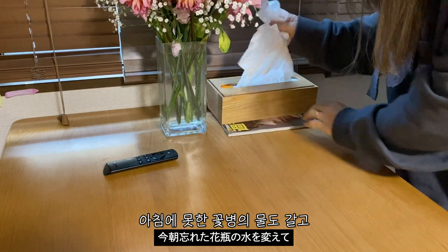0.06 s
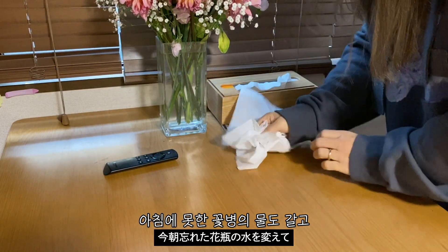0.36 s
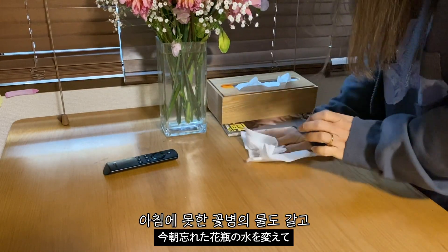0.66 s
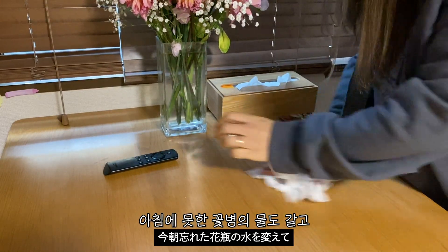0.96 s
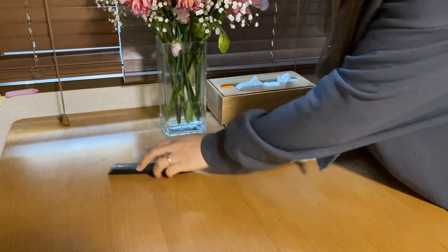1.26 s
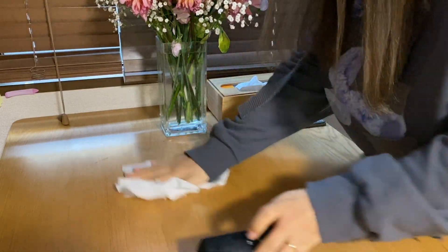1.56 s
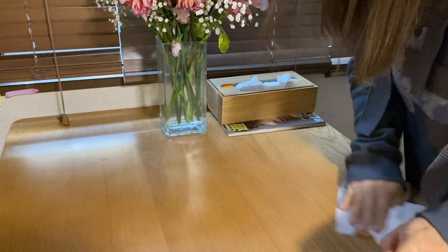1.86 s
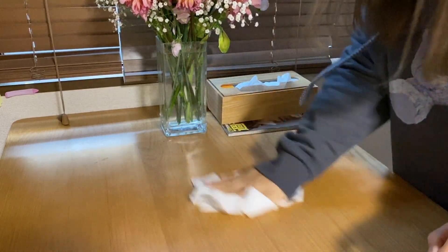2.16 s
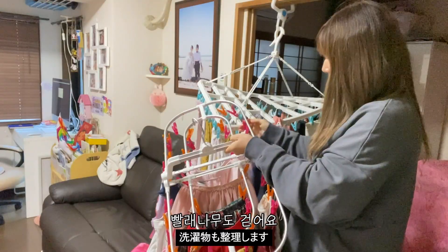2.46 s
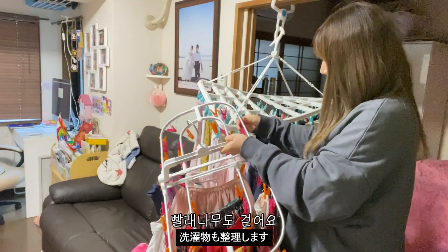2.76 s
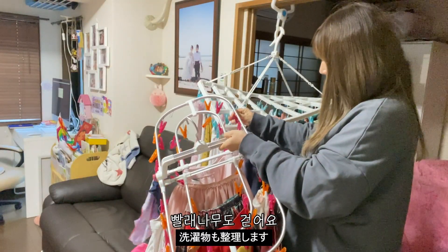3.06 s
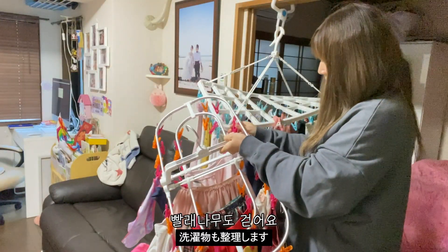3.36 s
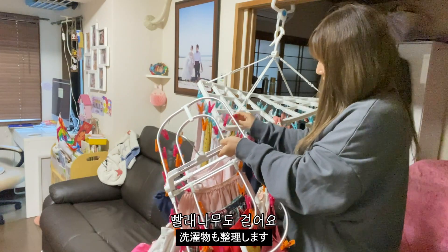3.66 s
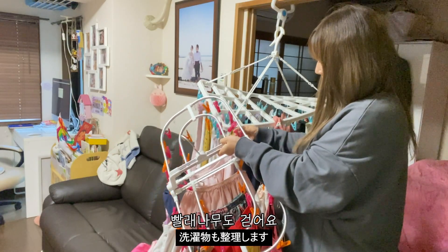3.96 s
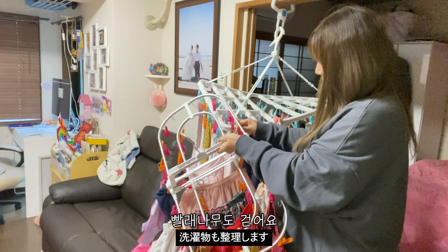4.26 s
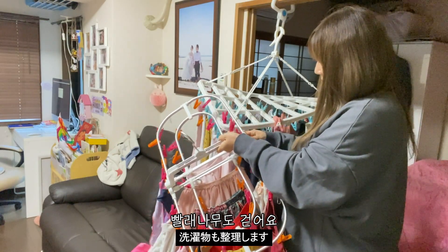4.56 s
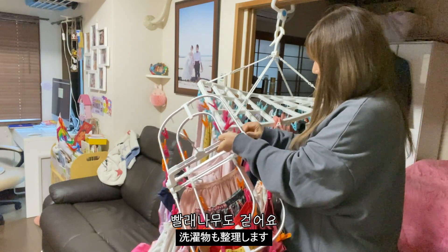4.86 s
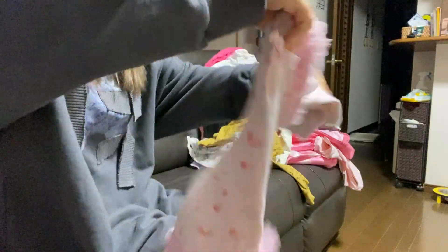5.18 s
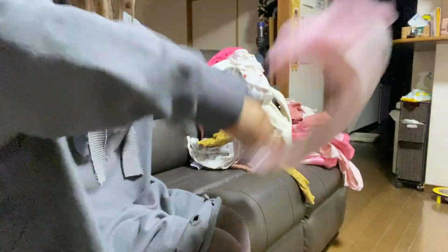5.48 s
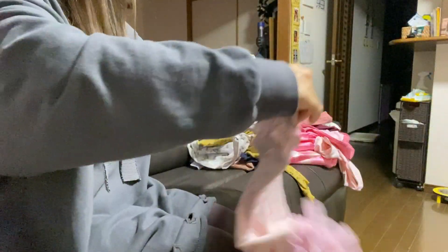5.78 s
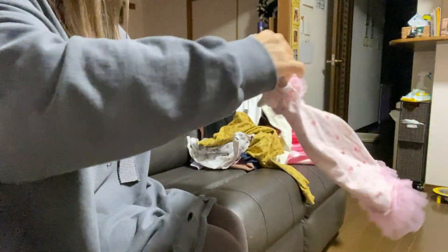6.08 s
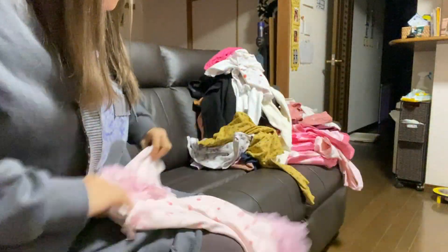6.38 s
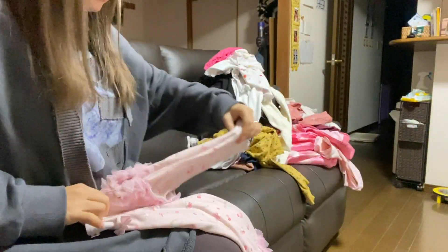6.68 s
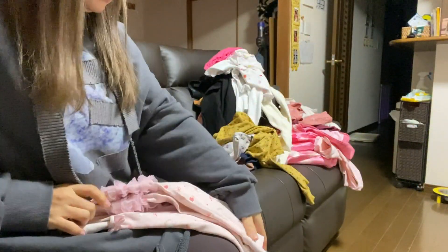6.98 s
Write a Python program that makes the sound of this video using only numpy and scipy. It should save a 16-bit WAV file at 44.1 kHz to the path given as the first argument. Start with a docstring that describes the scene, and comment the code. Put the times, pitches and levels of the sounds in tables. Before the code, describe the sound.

A tissue wipes a wooden table with knocks and scrapes, plastic laundry pegs click, then a small garment is shaken with one sharp flap.

```python
"""A tissue is tugged from its hollow box, then hisses over a wooden table in a small living room;
hands knock and judder on the wood, and a remote control thuds, scrapes and taps as it is lifted.
Next, laundry is unclipped from a plastic peg hanger: pegs snap, chatter and knock on the frame.
Last and loudest, a small garment whips taut in one sharp flap, then is laid on a lap and smoothed.
The room hums quietly throughout."""
import sys
import numpy as np
from scipy import signal
from scipy.fft import rfft, irfft, next_fast_len
from scipy.io import wavfile

SR = 44100
rng = np.random.default_rng(int(sys.argv[2]) if len(sys.argv) > 2 else 0)


def waveform_to_disk(signal):
    """Save audio, clipped to [-1, 1], as 16-bit WAV at the path in sys.argv[1]."""
    frames = np.transpose(np.atleast_2d(signal))
    scaled = np.clip(frames, -1, 1) * 32767
    samples = np.round(scaled).astype(np.int16)
    wavfile.write(sys.argv[1], SR, samples)


N = 318843
TIME = np.arange(N) / SR
SLOW = TIME[::40]   # coarse time axis for hand movements
HANGER_START_S, HANGER_END_S = 2.4, 4.999


def amp(db):
    """Decibels to gain."""
    return 10 ** (np.asarray(db) / 20)


def rms_one(x):
    """Scale to rms 1."""
    return x / np.sqrt(np.mean(x ** 2) + 1e-20)


def fader(rows):
    """Gain over time from (s, dB) rows; silent outside them."""
    s, db = np.transpose(rows)
    return amp(np.interp(TIME, s, db, left=-200, right=-200))


def at_hz(points, hz):
    """Read a curve on a log-frequency axis."""
    points = np.array(points)
    return np.interp(np.log(hz + 1e-9), np.log(points[:, 0]), points[:, 1])


def colour(x, curve):
    """Apply an EQ curve that falls off steeply below its first point; rms 1."""
    size = next_fast_len(N)
    hz = np.arange(size // 2 + 1) * SR / size
    gain = amp(at_hz(curve, hz)) * np.minimum(hz / curve[0][0], 1) ** 2
    return rms_one(irfft(rfft(x, size) * gain, size)[..., :N])


def drift(per_s):
    """Random wander, gliding to a new value per_s times a second."""
    knots = rng.standard_normal(4000)
    return np.interp(TIME * per_s, np.arange(len(knots)), knots)


def grains(per_s, spread_db, clump_db):
    """Tiny stick-slip releases of uneven size that come in clumps; rms 1."""
    sizes = amp(spread_db * np.minimum(rng.exponential(1, N), 4)) * rng.choice([-1, 1], N)
    released = rng.random(N) < per_s / SR
    return rms_one(sizes * released * amp(clump_db * drift(70)))


def resonate(x, modes, detune=1):
    """Parallel resonances (Hz, width in Hz, dB) with alternating signs."""
    out = 0
    for k, (hz, width, db) in enumerate(modes):
        radius, angle = np.exp(-np.pi * width / SR), 2 * np.pi * hz * detune / SR
        ring = signal.lfilter([1, 0, -1], [1, -2 * radius * np.cos(angle), radius ** 2], x + 1e-18)
        out = out + (-1) ** k * amp(db) * (1 - radius ** 2) / 2 * ring
    return out


def add(track, s, sound):
    """Mix a short sound into a track at s seconds."""
    start = max(round(s * SR), 0)
    track[start:start + len(sound)] += sound[:N - start]


def stroke(s, length, rise=0.48, shape=2):
    """Coarse gain of a hand movement that peaks at s; shape 1 is pointed, 2 is rounded."""
    away = np.maximum((s - SLOW) / rise, (SLOW - s) / (1 - rise)) / length
    return np.exp(-np.minimum(away ** shape, 20))


def together(gains):
    """Gain per sample of unrelated movements heard at once: their powers add."""
    return np.interp(TIME, SLOW, np.sqrt(sum(gain ** 2 for gain in gains)))


def pulses(rows):
    """Short pushes of air: pressure wavelets from (s, peak dB, Hz, cycles) rows."""
    out = np.zeros(N)
    for s, db, hz, cycles in rows:
        half = round(2 * cycles / hz * SR) + 1
        phase = np.arange(-half, half + 1) * hz / SR
        wave = np.exp(-(2 * phase / cycles) ** 2) * np.sin(2 * np.pi * phase)
        add(out, s - half / SR, amp(db) * wave / np.abs(wave).max())
    return out


# The room's stereo width. Each row: frequency in Hz, left-right correlation.
STEREO_LIKENESS = [(60, 0.95), (250, 0.63), (500, 0.41), (900, -0.26), (2000, 0.1), (6000, 0.11)]
def stereo_noise(size):
    """White noise, alike on both sides in the bass and nearly unrelated higher up."""
    mid, side = rfft(rng.standard_normal((2, next_fast_len(size, True))))
    alike = at_hz(STEREO_LIKENESS, np.linspace(0, SR / 2, len(mid)))
    return irfft(np.sqrt(1 + alike) * mid + np.sqrt(1 - alike) * side * [[1], [-1]])[:, :size]


def reverb_tail(x, t60):
    """Diffuse tail of a moving source: each short stretch of sound meets other reflections."""
    hop, size = SR // 25, SR // 3
    t, window = TIME[:size], np.sin(np.linspace(0, np.pi, 2 * hop))
    decay = rms_one(amp(-60 * t / t60) * (1 - np.exp(-t / 0.00006))) / np.sqrt(size)
    noise = rms_one(stereo_noise(N + size))
    padded, out = np.pad(x, (hop, 2 * hop)), np.zeros((2, N + 2 * size))
    for i, place in zip(range(0, N, hop), rng.integers(0, N, N // hop + 1)):
        piece = padded[i:i + 2 * hop] * window
        if np.abs(piece).max() > 1e-6:
            tail = signal.fftconvolve(piece[None], noise[:, place:place + size] * decay, axes=1)
            out[:, i:i + tail.shape[1]] += tail
    return out[:, hop:hop + N]


# Early reflections off nearby surfaces. Each row: delay in seconds, level in dB.
REFLECTIONS = [(.0033, -20.5), (0.0106, -15)]
def room(x, wet_db, t60, lag_s=0, echo_db=0):
    """Direct sound (reaching the right side lag_s later), two near reflections and the diffuse tail."""
    early = x + sum(amp(db + echo_db) * np.interp(TIME - delay, TIME, x, left=0)
                    for delay, db in REFLECTIONS)
    direct = np.array([early, np.roll(early, round(lag_s * SR))])
    return (direct + amp(wet_db) * reverb_tail(x, t60)) / np.sqrt(1 + amp(2 * wet_db))


# The dark bed of room tone. Each row: frequency in Hz, EQ gain in dB.
ROOM_TONE_EQ = [(30, -8), (48, -3.5), (68, 4), (120, -4.5), (210, -12.5), (450, -16), (800, -18.5),
                (1150, -17.5), (1500, -22.5), (2200, -28), (4000, -44), (9000, -47.5), (15000, -60)]
# The hum's bands. Each row: centre in Hz, width in Hz, gain in dB.
HUM_BANDS = [(205, 30, 2), (381.5, 19, -3.5), (597, 11.8, 1), (718.5, 11.7, -1.5), (878, 25, 0),
             (1143, 76, -14)]
# Fader moves for the bed and for the hum. Each row: time in seconds, level in dB.
ROOM_TONE_FADER = [(0, -54.5), (2.38, -59), (2.42, -59.5), (4.98, -60), (5.02, -55.5), (7.23, -57.5)]
HUM_FADER = [(0, -70), (2.4, -66), (4.98, -69.5), (5.02, -68), (7.23, -62)]
def room_hum():
    """A soft, low wash of noise with narrow, wavering bands humming in it."""
    bed = fader(ROOM_TONE_FADER) * colour(stereo_noise(N), ROOM_TONE_EQ)
    hum = fader(HUM_FADER) * rms_one(resonate(stereo_noise(N), HUM_BANDS))
    return bed + hum


# The box's hollow voice. Each row: centre in Hz, width in Hz, gain in dB.
BOX_MODES = [(245, 110, 0), (520, 130, 2), (760, 160, -4), (1550, 300, -14)]
def tissue_pull(drag):
    """The tissue is tugged free, then drags through the slot; its friction sounds the box."""
    tug = amp(-42 - 300 * np.minimum(SLOW, 1))   # falls 300 dB a second
    friction = grains(per_s=2500, spread_db=0.78, clump_db=1.2)
    return together([tug, amp(-53.5) * drag]) * rms_one(resonate(friction, BOX_MODES))


# The box's pop. Each row: pitch in Hz, level in dB, seconds to fade by 60 dB.
BOX_POP_TONES = [(228, -40, .15), (468, -36.5, .1)]
def box_pop():
    """The lifted box drops back on the table and its hollow body rings briefly."""
    out, t = np.zeros(N), TIME[:SR // 2]
    for hz, db, t60 in BOX_POP_TONES:
        add(out, 0, amp(db - 60 * t / t60) * np.sin(2 * np.pi * hz * t))
    return out


# Strokes of the tissue. Each row: peak time in seconds, length in seconds, hiss in dB, rumble in dB.
WIPE_STROKES = [(0.576, 0.044, -57.5, -75), (.79, 0.32, -59.5, -77), (1.044, 0.39, -57, -61.5),
                (1.39, 0.56, -58.5, -56), (1.702, 0.32, -54, -62), (1.966, 0.22, -54, -61),
                (2.184, 0.19, -55, -52), (2.347, 0.24, -51, -61)]
# The papery hiss. Each row: frequency in Hz, EQ gain in dB.
TISSUE_EQ = [(500, -7.5), (1200, -5), (4000, -5.5), (7500, -9), (10000, -5.5), (15500, -11.5)]
# The table top under a rubbing hand. Each row: centre in Hz, width in Hz, gain in dB.
RUMBLE_MODES = [(57.7, 19, 6), (168, 61, 3.5)]
def tissue_wipe(drag, slips):
    """Returns the tissue's hiss in the slot and on the wood, and the table's rumble under the hand."""
    sliding = [amp(-65.5) * (SLOW < HANGER_START_S), amp(-47) * drag]   # rustle in the hand, slot drag
    pressing = []
    for s, length, hiss_db, rumble_db in WIPE_STROKES:
        swell = stroke(s, length, rise=0.63, shape=2.85)
        sliding.append(amp(hiss_db) * swell)
        pressing.append(amp(rumble_db) * swell)
    paper = colour(grains(per_s=14000, spread_db=1.6, clump_db=1.95), TISSUE_EQ)
    wood = rms_one(resonate(slips, RUMBLE_MODES))
    return together(sliding) * paper, together(pressing) * wood


# Groans of the pressed hand. Each row: peak time in seconds, length in seconds, level in dB,
# pitch in Hz, glide in Hz per second.
HAND_JUDDERS = [(2.154, 0.094, -51, 188.8, 249), (2.29, 0.094, -48, 165.7, -330)]
def hand_judder(roughness=0.0566):
    """The hand sticks and slips almost regularly: a low, rough groan that glides with its speed."""
    out = 0
    for s, length, db, hz, glide in HAND_JUDDERS:
        gliding_hz = hz + glide * np.clip(TIME - s, -length, length)
        slip_hz = gliding_hz * (1 + roughness * drift(120.3))
        swell = amp(db) * together([stroke(s, length)])
        out = out + swell * np.sin(2 * np.pi * np.cumsum(slip_hz) / SR)
    return out


# The table top's ring. Each row: pitch in Hz, gain in dB, seconds to fade by 60 dB.
TABLE_MODES = [(52.2, 0, 0.27), (127.2, 3, 0.26), (172, -4, 0.048), (215, -2, 0.18), (292, 1, 0.08),
               (378, -1, 0.1), (485, -1, 0.05), (1010, -9.5, 0.077), (1470, -7, .06)]
# Hands and the remote bumping the table. Each row: start in seconds, level in dB,
# most excited pitch in Hz.
TABLE_KNOCKS = [(0.352, -52, 60), (0.643, -42, 430), (0.652, -32.5, 135), (0.692, -34, 55),
                (1.171, -43.5, 290), (1.177, -44, 100), (1.248, -41, 270), (1.256, -43, 100),
                (1.283, -43, 490), (1.535, -49, 55), (2.123, -58, 200)]
def table_knocks(falloff_db_per_octave=12):
    """A soft bump sets the table top ringing within a cycle, favouring modes near the bump's pitch."""
    out, t = np.zeros(N), TIME[:SR // 2]
    for s, db, contact_hz in TABLE_KNOCKS:
        for k, (hz, mode_db, t60) in enumerate(TABLE_MODES):
            struck_db = db + mode_db - falloff_db_per_octave * abs(np.log2(hz / contact_hz))
            envelope = (1 - np.exp(-2 * hz * t)) * amp(struck_db - 60 * t / t60)
            add(out, s, (-1) ** k * envelope * np.sin(2 * np.pi * hz * t))
    return out


# The remote's shell. Each row: centre in Hz, width in Hz, gain in dB.
SHELL_MODES = [(980, 1800, 15.5), (1384, 820, 23), (3040, 1300, 7.5), (4200, 5900, 2.5)]
# Hands, then the remote, scraping the table. Each row: peak time in seconds, length in seconds,
# level in dB, share of gritty shell sound from 0 to 1.
TABLE_SCRAPES = [(0.645, 0.037, -43.5, 0.7), (0.977, 0.05, -46.5, 0.65), (1.242, 0.055, -43, 0.7),
                 (1.288, 0.045, -44.5, 0.3), (1.364, 0.065, -43.5, 0.99)]
# The shell tapping the table. Each row: time in seconds, peak in dB, pitch in Hz, length in cycles.
SHELL_TAPS = [(1.1725, -36.5, 1190, 0.86), (1.247, -56, 1800, 0.68)]
def remote_scrapes(slips):
    """Stick-slip scrapes sound the table's wood and the remote's gritty shell."""
    upper_share = np.where(TIME < 1.5, 0.22, 0.58)
    lower = rms_one(resonate(slips, SHELL_MODES[:2]))
    upper = rms_one(resonate(slips, SHELL_MODES[2:]))
    shell = np.sqrt(1 - upper_share) * lower + np.sqrt(upper_share) * upper
    wood = rms_one(resonate(slips, [(hz, 0.29 * hz, db) for hz, db, _ in TABLE_MODES[2:]]))
    pushes = [(amp(db) * stroke(s, length, rise=0.55, shape=0.65), grit)
              for s, length, db, grit in TABLE_SCRAPES]
    on_shell = together(gain * np.sqrt(grit) for gain, grit in pushes)
    on_wood = together(gain * np.sqrt(1 - grit) for gain, grit in pushes)
    return on_shell * shell + on_wood * wood + pulses(SHELL_TAPS)


def table_wiping():
    """Airy friction, leaning slightly left, over the drier thuds and groans of table and box."""
    drag = amp(-76 * np.maximum(SLOW - 0.085, 0))   # holds, then fades as the tissue slips out
    slips = grains(per_s=4000, spread_db=2.5, clump_db=1.5)
    hiss, rumble = tissue_wipe(drag, slips)
    friction = hiss + tissue_pull(drag) + remote_scrapes(slips)
    airy = room(friction, wet_db=0, t60=0.25, lag_s=0.00005) * amp([[0.7], [-0.7]])
    lows = table_knocks() + rumble + hand_judder() + box_pop()
    return airy + room(lows, wet_db=-13, t60=0.19)


# Pegs snapping and knocking. Each row: start in seconds, level in dB, brightness in dB (jaw up,
# frame down), looseness from 0 to 1, ring of the struck piece in Hz, its relative level in dB.
PEG_SNAPS = [(2.4772, -59, 10.5, 0.8, 3820, -7), (2.5452, -61.5, 7.5, 0.2, 12100, 5),
             (2.6195, -64.5, 11, 0.2, 11700, 11), (2.685, -79, 10, 0.1, 11500, 23),
             (2.6897, -68, 11.5, 1, 12500, 10), (2.8017, -64, 10.5, 0.1, 11800, 12.5),
             (2.816, -62, 9.5, 0.9, 5650, -6), (2.8459, -61, -1.5, .6, 1830, -9),
             (2.9098, -66, -1, 0.27, 2680, -20), (2.933, -70, 8.5, .1, 11100, 5),
             (2.9454, -61, 7.5, 0.72, 5630, -1), (3.0273, -67.5, 10.5, .2, 6100, 4),
             (3.1068, -60.5, 16, 0.05, 10600, 23), (3.3158, -62, 2, 0.3, 3600, -2),
             (3.352, -78, -6, 0, 5000, 16), (3.368, -59.5, 10, 0.72, 4060, 6),
             (3.398, -70.5, 12, 0.4, 6100, 14), (3.606, -72, 9, 0.2, 11200, 10.5),
             (3.6668, -73.5, 10, 0.3, 7900, 18), (3.76, -67, 14.5, 0.24, 12400, 15),
             (3.8183, -59.5, 4, 0.75, 6740, -2), (4.154, -55.5, -0.5, 0.4, 1525, 0),
             (4.253, -66, 8, 0.9, 11900, 10), (4.3603, -57, 7.5, 0.66, 5800, 2),
             (4.376, -64.5, 4, 0.7, 5900, 12), (4.4874, -58.5, 3.5, 0.67, 11000, 14),
             (4.8917, -58, 11, 0.8, 11000, 11), (4.901, -57, 6, 0.95, 6640, 2),
             (4.9392, -61, 9, 0.6, 4840, 9)]
# The plastic frame, peg body and jaw. Each row: centre in Hz, width in Hz, gain in dB.
FRAME_MODES = [(1270, 540, 1.5), (2130, 1200, 2.5)]
PEG_MODES = [(3040, 1400, 10), (4750, 4600, 10.4), (7440, 2400, 1.6)]
JAW_MODES = [(7900, 2000, -1.5), (10600, 2000, 0)]
def peg_clicks(contact_s=0.00035, chatter_s=0.016, chatter_per_s=860, ring_q=6):
    """A peg shuts with a crunch, then chatters on its hook; each blow rings the plastic differently."""
    out, t = np.zeros(N), TIME[:SR // 12]
    for s, db, bright_db, loose, ring_hz, ring_db in PEG_SNAPS:
        crunch = rms_one(rng.choice([-1, 1], len(t)) * np.exp(-t / contact_s))
        bounces = rng.random(len(t)) < chatter_per_s / SR
        chatter = rms_one(bounces * rng.standard_normal(len(t)) * np.exp(-t / chatter_s))
        force = np.sqrt(1 - loose) * crunch + np.sqrt(loose) * chatter
        detune = np.exp(rng.normal(0, 0.02))
        piece = [(ring_hz, ring_hz / ring_q, 0)]
        parts = (FRAME_MODES, -bright_db), (PEG_MODES, 3.5), (JAW_MODES, bright_db), (piece, ring_db)
        for modes, part_db in parts:
            struck = [(hz, width, mode_db + rng.normal(0, 1.5)) for hz, width, mode_db in modes]
            # a small part radiates little below its lowest resonance
            low_cut = signal.butter(2, 0.7 * modes[0][0], "high", fs=SR, output="sos")
            ring = signal.sosfilt(low_cut, resonate(force, struck, detune))
            add(out, s, amp(db + part_db) * rms_one(ring))
    high_cut = signal.butter(3, 12800, fs=SR, output="sos")   # rolls off the clicks' highest treble
    return signal.sosfilt(high_cut, out)


# Cloth drawn out of the pegs. Each row: peak time in seconds, length in seconds, level in dB.
CLOTH_DRAWS = [(2.418, 0.19, -50.5), (3.055, 0.7, -55.5), (3.702, 0.073, -50.5), (3.826, 0.063, -53),
               (4.02, 0.08, -54), (4.306, 0.11, -50), (4.695, 0.37, -60.5), (4.983, .07, -55)]
# Jostling plastic. Each row: frequency in Hz, EQ gain in dB.
RATTLE_EQ = [(900, -9.5), (1500, -11), (3000, -10.5), (5000, -9), (7000, -11), (11000, -9), (13000, -17),
             (15500, -19.5)]
def hanger_rattle(sway_db=-70):
    """Pegs jostle as the hanger sways, just after a loose peg snaps, and as cloth is drawn out."""
    handled = (TIME > HANGER_START_S) & (TIME < HANGER_END_S)
    shaken = [amp(db + 4) * loose * stroke(s + 0.021, length=0.13, rise=0.27, shape=2.8)
              for s, db, _, loose, *_ in PEG_SNAPS]
    drawn = [amp(db) * stroke(s, length, rise=0.56, shape=0.91) for s, length, db in CLOTH_DRAWS]
    jostle = colour(grains(per_s=7000, spread_db=2.5, clump_db=2), RATTLE_EQ)
    return together([amp(sway_db)] + shaken + drawn) * handled * jostle


def peg_hanger():
    """Sharp, close clicks over a fine, diffuse rattle."""
    clicks = room(peg_clicks(), wet_db=-2.5, t60=0.25, lag_s=-0.00004)
    return clicks + room(hanger_rattle(), wet_db=5.5, t60=0.12)


# Sleeves and garment sweeping past. Each row: peak time in seconds, length in seconds, rub in dB,
# swish in dB.
CLOTH_SWEEPS = [(5.023, 0.078, -59, -71.5), (5.176, 0.069, -50.5, -58.5), (5.45, 0.35, -49, -67.5),
                (5.695, 0.19, -54.5, -91), (6.03, 0.091, -59.5, -77), (6.428, 0.22, -50.5, -70.5),
                (6.636, 0.31, -61.5, -82), (6.84, 0.18, -55, -73.5), (7.222, 0.11, -59, -71.5)]
# The soft rub, the fine swish and the smoothing palm. Each row: frequency in Hz, EQ gain in dB.
RUB_EQ = [(100, 4), (450, -9.5), (1200, -18.5), (2600, -27.5), (5000, -52)]
SWISH_EQ = [(1000, -8), (2200, -7), (4000, -1), (7000, -5), (10000, -2.5), (15000, -13)]
PALM_EQ = [(1300, 0), (2200, -2), (4200, -6), (5500, -17), (12000, -30)]
# Cloth landing on the lap. Each row: time in seconds, peak in dB, pitch in Hz, length in cycles.
LAP_PATS = [(5.279, -42, 620, 1.5), (6.375, -38, 700, 0.8), (6.4, -37, 650, 0.8), (6.492, -44, 544, 2),
            (6.835, -46, 71.4, 2.5), (6.891, -42.5, 490, 1.3)]
def cloth_handling(weave):
    """Cloth rubs and swishes over cloth, pats down on the lap, and a palm smooths the sleeve flat."""
    rubbing, swishing = [], []
    for s, length, rub_db, swish_db in CLOTH_SWEEPS:
        swell = stroke(s, length, rise=0.35, shape=1.28)
        rubbing.append(amp(rub_db) * swell)
        swishing.append(amp(swish_db) * swell)
    rub = together(rubbing) * colour(grains(per_s=900, spread_db=3, clump_db=6.1), RUB_EQ)
    swish = together(swishing) * colour(grains(per_s=3600, spread_db=5.5, clump_db=1.9), SWISH_EQ)
    palm = amp(-71) * together([stroke(s=6.76, length=0.46)]) * colour(weave, PALM_EQ)
    return room(rub + swish + palm + pulses(LAP_PATS), wet_db=8, t60=0.2)


# Ticks from the garment's frill. Each row: time in seconds, peak in dB.
FRILL_TICKS = [(6.491, -52), (6.518, -54), (6.5394, -50), (6.5685, -46), (6.739, -59)]
def frill_creases(hz=4200, cycles=0.34):
    """Each crease flicks over with one tiny, bright push of air."""
    return room(pulses([(s, db, hz, cycles) for s, db in FRILL_TICKS]), wet_db=-4, t60=0.2)


# The whip, one pulse per fold. Each row: time in seconds, peak in dB, pitch in Hz, length in cycles.
FOLD_PULSES = [(5.4832, -30, 3000, 0.2), (5.5035, -25, 53, 0.9), (5.5436, -15, 2000, 0.3),
               (5.5468, -21, 750, 1.5), (5.5535, -15, 700, 1.3), (5.555, -12, 1150, 1.6),
               (5.5572, -14.5, 330, 0.9), (5.5655, -23.5, 78, 1.3)]
# Fabric fluttering around the flap. Each row: time in seconds, level in dB.
FLUTTER_FADER = [(5.42, -71), (5.465, -60), (5.488, -42), (5.51, -52), (5.537, -54), (5.543, -27),
                 (5.555, -29), (5.565, -36), (5.59, -58), (5.65, -89)]
# The flutter's tone. Each row: frequency in Hz, EQ gain in dB.
FLUTTER_EQ = [(150, -2), (500, 2), (1100, 1), (2400, -6.5), (6000, -18), (15000, -29)]
# The room's standing waves. Each row: centre in Hz, width in Hz, relative gain in dB.
STANDING_WAVES = [(296, 22, 0), (506, 34, 0), (865, 50, -9)]
# Notches where reflections cancel. Each row: centre in Hz, width in Hz, cancelling wave's gain in dB.
ROOM_NOTCHES = [(140, 70, -3), (390, 70, -7), (650, 50, -2)]
def garment_flap(weave):
    """One shake whips the folds taut; the burst of air wakes the room's standing waves."""
    snap = pulses(FOLD_PULSES) + fader(FLUTTER_FADER) * colour(weave, FLUTTER_EQ)
    standing = amp(4) * sum(resonate(snap, [mode]) for mode in STANDING_WAVES)
    flap = room(snap + standing, wet_db=-6.5, t60=0.32, lag_s=-0.00009, echo_db=-20)
    return flap - sum(resonate(flap, [notch]) for notch in ROOM_NOTCHES)


def scene():
    """The three chores follow each other abruptly over the hum of the room."""
    background = room_hum()
    wiping = table_wiping() * (TIME < HANGER_START_S)
    unclipping = peg_hanger() * (TIME < HANGER_END_S)
    weave = grains(per_s=20000, spread_db=1.5, clump_db=0.8)
    garment = garment_flap(weave) + cloth_handling(weave) + frill_creases()
    return background + wiping + unclipping + garment


def record(dry):
    """The stereo microphone's sides share most treble, a few samples apart; deep bass and top are cut."""
    size = next_fast_len(N, True)
    hz, spectrum = np.arange(size // 2 + 1) * SR / size, rfft(dry, size)
    shared = 0.85 * np.clip((hz - 5800) / 2800, 0, 1)
    left_treble = irfft(spectrum[0] * np.sqrt(shared), size)[:N]
    # on the right, this treble leads during the wiping and lags afterwards
    shifted = np.where(TIME < HANGER_START_S, np.roll(left_treble, -13), np.roll(left_treble, 7))
    right = irfft(spectrum[1] * np.sqrt(1 - shared), size)[:N] + shifted
    low_cut = signal.butter(3, 34, "high", fs=SR, output="sos")
    high_cut = signal.ellip(10, 0.1, 70, 15900, fs=SR, output="sos")
    return signal.sosfilt(high_cut, signal.sosfilt(low_cut, [dry[0], right]))


dry = scene()
out = record(dry)
waveform_to_disk(out)
```